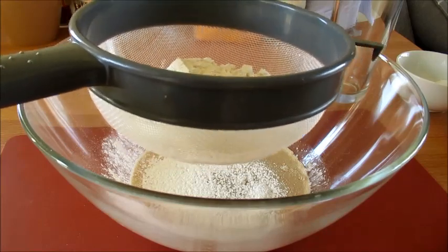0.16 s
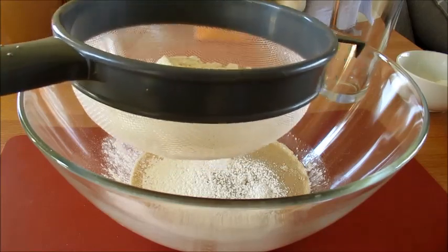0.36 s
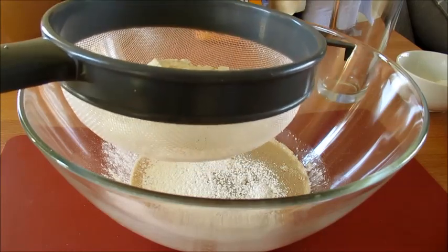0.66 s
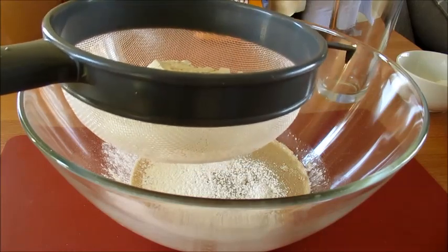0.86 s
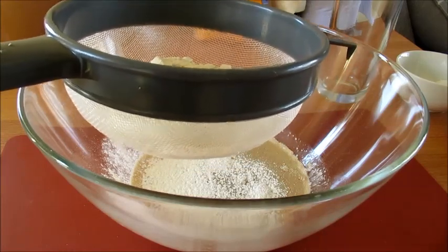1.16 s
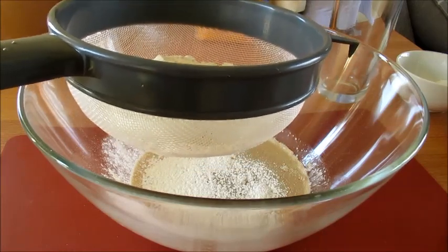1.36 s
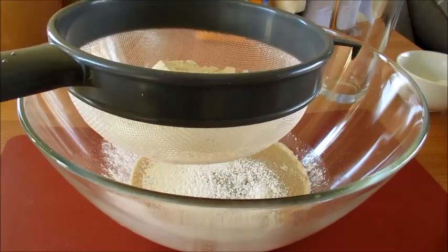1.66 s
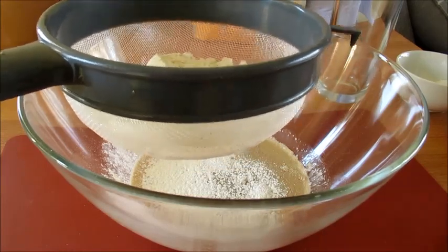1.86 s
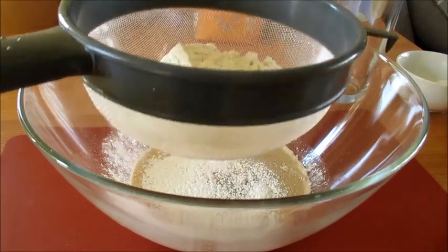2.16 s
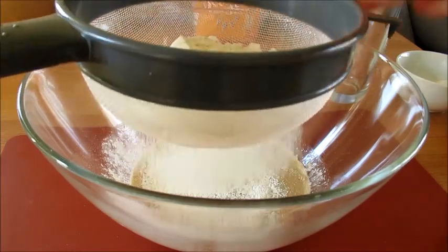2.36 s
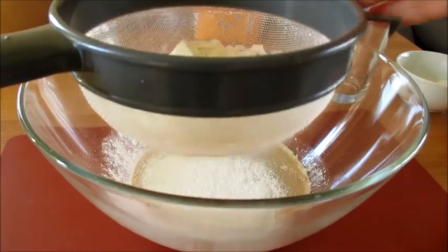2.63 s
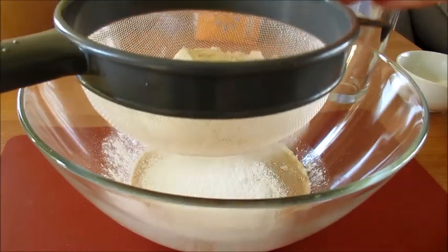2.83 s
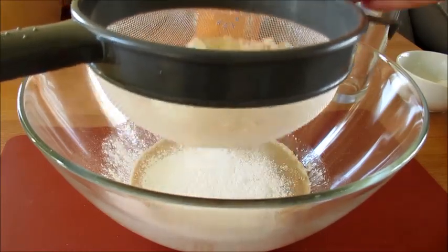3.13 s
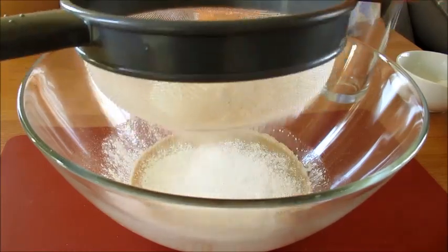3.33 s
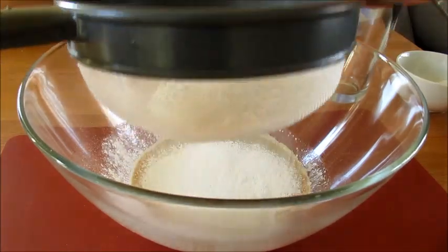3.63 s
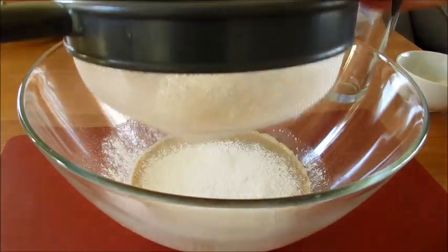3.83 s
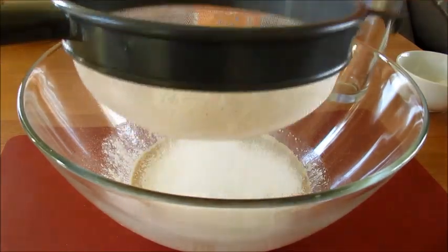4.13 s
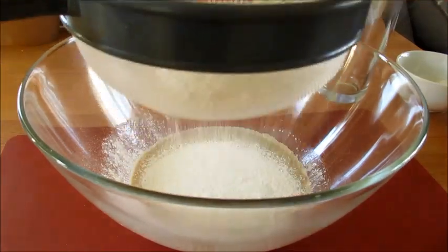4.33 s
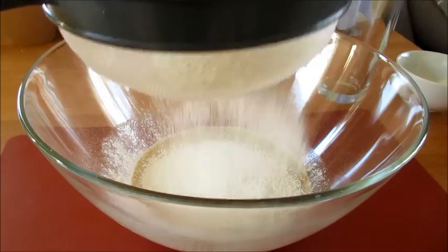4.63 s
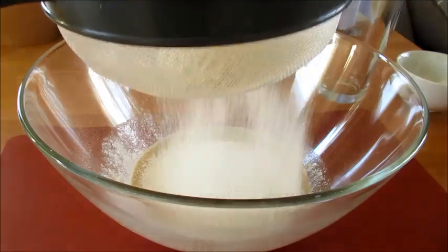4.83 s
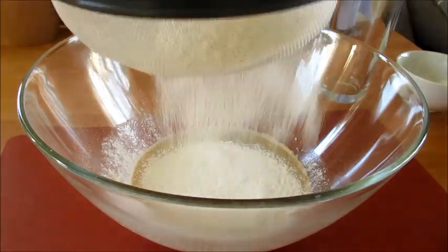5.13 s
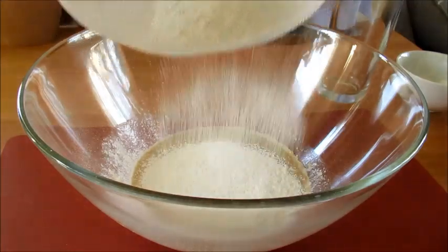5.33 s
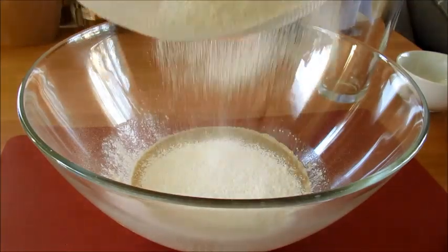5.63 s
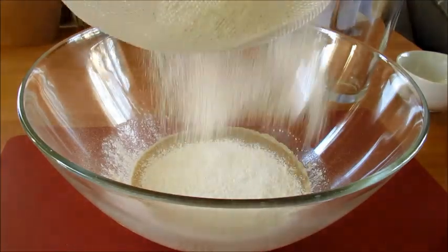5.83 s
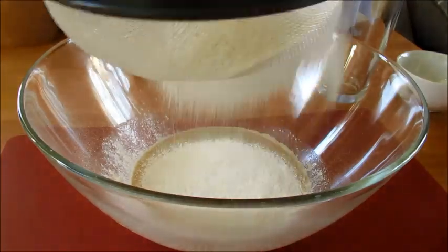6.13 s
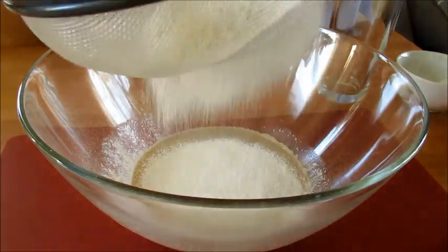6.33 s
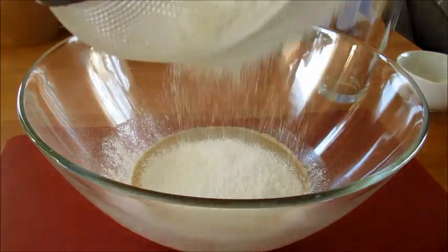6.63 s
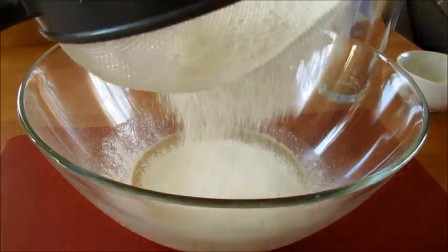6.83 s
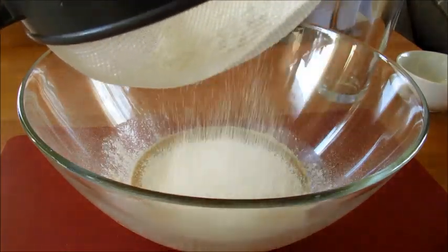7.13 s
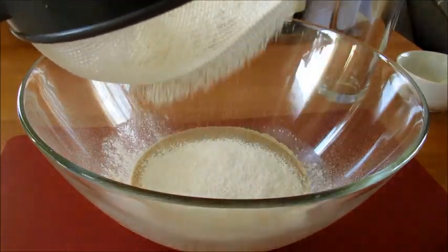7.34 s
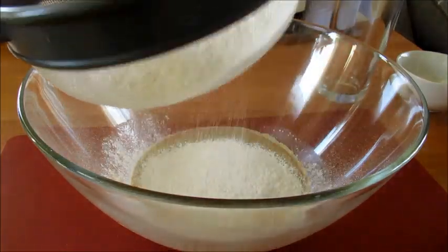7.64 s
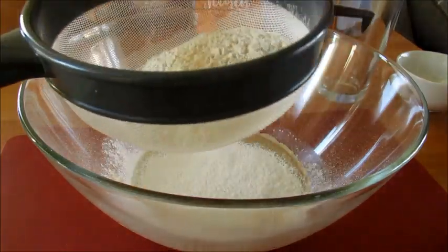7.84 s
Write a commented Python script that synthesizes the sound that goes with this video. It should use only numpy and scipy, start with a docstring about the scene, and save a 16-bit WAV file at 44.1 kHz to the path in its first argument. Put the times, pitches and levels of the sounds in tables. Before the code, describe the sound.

A small, quiet kitchen heard close up in mono, with soft, mostly low room noise. In the first 0.6 seconds a very faint low growl sits in a soft swelling rush, then a plain sinking hum fades out by about 1.3. At 1.2 a hard double clack sounds, and at 1.4 the loudest, heaviest knock, woody and ringing, with a thin high glass ping. A short low rubbing slide follows, groaning slightly at 1.6, and ends in a duller bump at 1.7. Near quiet until 2.4, when a hand begins patting the sieve about six times a second: soft low thumps, crisp gritty mesh hiss and a softer patter of falling flour. Small low plops join, clearest around 2.7 to 5.5. The rasps grow brighter and stronger at 6.5 to 7.0, with a tiny snap at 6.7, then weaken towards 7.9.

```python
"""In a small kitchen, flour is sifted into a glass bowl. A faint growl in a soft rush opens, then a plain hum.
A clack, a heavy knock, a short slide and a second knock set the table and the bowl ringing: filtered clicks
and rubbing noise drive a set of decaying or resonant notes. Then a hand pats the sieve about six times a second:
each pat is a low thump and a burst of gritty hiss from the mesh, and the tossed flour drops back a moment later
as softer hiss, at times with a small, low plop."""
import sys
import numpy as np
from scipy import signal
from scipy.fft import rfft, irfft
from scipy.io import wavfile

SR = 44100
rng = np.random.default_rng(int(sys.argv[2]) if len(sys.argv) > 2 else 0)


def persist_wave(psi):
    """Save psi, clipped to +-1, as 16-bit WAV."""
    counts = np.round(np.clip(psi, -1, 1) * 32767).astype(np.int16)
    wavfile.write(sys.argv[1], SR, np.atleast_2d(counts).T)


N = 352359
TIME = np.arange(N) / SR
ONE_SECOND = TIME[:SR]
SHORT = TIME[:8192]


def from_db(db):
    """Turn decibels into a gain."""
    return 10 ** (np.asarray(db) / 20)


def rms_one(x):
    """Scale a sound to an rms (average strength) of 1."""
    return x / np.sqrt(np.mean(x ** 2) + 1e-20)


def at_hz(points, hz):
    """Read a table between its rows, with frequency on a log axis."""
    f, value = np.transpose(points)
    return np.interp(np.log(hz + 1e-9), np.log(f), value)


def noise(spectrum, size=N):
    """Random noise whose frequencies are weighted by a spectrum, rms 1."""
    hz = np.fft.rfftfreq(size, 1 / SR)
    white = rfft(rng.standard_normal(size))
    return rms_one(irfft(white * from_db(at_hz(spectrum, hz)), size))


def cut(x, hz, kind, order=2):
    """Butterworth filter: keep only the low, high or middle frequencies."""
    return signal.sosfilt(signal.butter(order, hz, kind, fs=SR, output="sos"), x)


def resonate(x, hz, width_hz):
    """A resonance that favours one frequency, with gain 1 at its top."""
    return signal.lfilter(*signal.iirpeak(hz, hz / width_hz, fs=SR), x)


def ring(hz, t60):
    """A struck note that starts at height 1 and falls by 60 dB in t60 seconds."""
    return np.sin(2 * np.pi * hz * ONE_SECOND) * from_db(-60 * ONE_SECOND / t60)


def swell(rise_s):
    """An envelope that reaches 1 after rise_s and then dies away."""
    return SHORT / rise_s * np.exp(1 - SHORT / rise_s)


def envelope(start_s, attack_s, hold_s, release_s):
    """Rise, hold and fall in straight lines, between 0 and 1."""
    corners = start_s + np.cumsum([0, attack_s, hold_s, release_s])
    return np.interp(TIME, corners, [0, 1, 1, 0])


def tone(shape, hz, glide_hz_per_s, waver, partials=((1, 0),)):
    """Soft partials on a gliding pitch that wavers at random, under an envelope."""
    pitch = hz + glide_hz_per_s * (TIME - shape[0])
    unsteady = rms_one(cut(rng.standard_normal(N), 21, "low"))
    # a changing pitch must be summed up over time to give the phase
    phase = 2 * np.pi * np.cumsum(pitch * (1 + waver * unsteady)) / SR
    mix = np.zeros(N)
    for multiple, db in partials:
        mix += from_db(db) * np.sqrt(2) * np.sin(multiple * phase)
    return envelope(*shape) * mix


def add(out, s, sound):
    """Mix a sound in at time s, cutting what runs past the end."""
    i = round(s * SR)
    out[i:i + len(sound)] += sound[:N - i]


# how long the kitchen echoes at each pitch: (frequency [Hz], time to fall by 60 dB [s])
KITCHEN_DECAY = [(125, 0.35), (2000, 0.41), (14000, 0.18)]


def kitchen(x, build_s=0.002):
    """Diffuse reflections build up quickly and die at each octave's own speed; the response has unit energy."""
    response = np.zeros(SR)
    edges = 2. ** np.arange(6, 15)
    for low, high in zip(edges, edges[1:]):
        band = cut(rng.standard_normal(SR), [low, high], "band", order=4)
        t60 = at_hz(KITCHEN_DECAY, np.sqrt(low * high))
        response += band * from_db(-60 * ONE_SECOND / t60)
    response *= 1 - np.exp(-(ONE_SECOND / build_s) ** 2)
    return signal.fftconvolve(x, response / np.linalg.norm(response))[:N]


# spectrum of the quiet room: (frequency [Hz], relative level [dB per Hz])
ROOM_COLOUR = [(15, -27), (25, -3.5), (69, -3), (128, -7), (264, -3), (326, -6), (529, -8), (856, -10),
               (978, -7.5), (1540, -12), (3930, -18), (6370, -18.5), (10900, -21), (13800, -26),
               (15000, -30.5)]


def room_floor(level_db=-54.5):
    """The quiet of the kitchen is a steady, mostly low noise."""
    return from_db(level_db) * noise(ROOM_COLOUR)


# shapes are (start [s], attack [s], hold [s], release [s])
GROWL_SHAPE, GROWL_HZ, GROWL_SAG_HZ_PER_S = (0.015, .005, 0.43, 0.19), 66.7, 9.25
HUM_SHAPE, HUM_HZ, HUM_SAG_HZ_PER_S = (.52, 0.25, .08, 0.45), 181, 22
# the rush has already begun to swell before the sound starts
RUSH_SHAPE = (-0.245, 0.77, 0.026, 0.049)
# partials of the growl: (multiple of its pitch, relative level [dB])
GROWL_PARTIALS = [(2, -12), (3, -6), (4, -1.5), (6, -5.5)]
# spectrum of the rush: (frequency [Hz], relative level [dB per Hz])
RUSH_COLOUR = [(80, -10), (230, 1), (700, -8), (2400, -13), (5000, -39)]


def drone():
    """A faint growl in a soft rush gives way to a plain hum; both pitches sink."""
    growl = tone(GROWL_SHAPE, GROWL_HZ, -GROWL_SAG_HZ_PER_S, waver=.02, partials=GROWL_PARTIALS)
    hum = tone(HUM_SHAPE, HUM_HZ, -HUM_SAG_HZ_PER_S, waver=0.0063)
    rush = envelope(*RUSH_SHAPE) * noise(RUSH_COLOUR)
    return from_db(-58.5) * growl + from_db(-52.5) * hum + from_db(-55) * rush


# the slide between the knocks: (start [s], attack [s], hold [s], release [s])
SLIDE_SHAPE = (1.387, 0.15, 0.157, 0.033)
GROAN_FADE_S = 0.016  # fade-in and fade-out alike
# spectrum of the rubbing: (frequency [Hz], relative level [dB per Hz])
SLIDE_COLOUR = [(50, -73), (140, -1.5), (190, -9), (380, -3), (660, -7.5), (1000, -17), (1800, -20),
                (4000, -34), (10000, -43), (15000, -44)]
# stick-slip groans late in the slide: (start [s], hold [s], pitch [Hz], glide [Hz per s], level [dB])
GROANS = [(1.603, .064, 323, 751.5, -33.5), (1.622, 0.0051, 640, 2, -25.5)]


def slide(level_db=-32, ring_db=6, width_hz=22):
    """Friction rumbles through the same modes that the knocks strike, and groans as it sticks."""
    rub = noise(SLIDE_COLOUR)
    sung = np.zeros(N)
    for hz, _, _ in MODES:
        sung += resonate(rub, hz, width_hz)
    out = from_db(level_db) * envelope(*SLIDE_SHAPE) * rms_one(rub + from_db(ring_db) * sung)
    for s, hold_s, hz, glide, db in GROANS:
        shape = (s, GROAN_FADE_S, hold_s, GROAN_FADE_S)
        out += from_db(db) * tone(shape, hz, glide, waver=0.0288)
    return out


PING_S = 1.425  # just after the heavy knock
# thin glass notes: (frequency [Hz], level before the beating [dB], time to fall by 60 dB [s])
PING_NOTES = [(3890, -37, 0.096), (5510, -47, .07), (6530, -38.5, 0.1), (8710, -42.5, 0.088),
              (10100, -72, .6)]


def ping(room_db=-8, beat_hz=24, beat_depth=.6):
    """The jolted glass rings high and thin with a beating level, blurred by the room."""
    notes = np.zeros(SR)
    for hz, db, t60 in PING_NOTES:
        notes += from_db(db) * ring(hz, t60)
    beating = 1 + beat_depth * np.sin(2 * np.pi * beat_hz * ONE_SECOND)
    out = np.zeros(N)
    add(out, PING_S, beating * notes)
    return out + from_db(room_db) * kitchen(out)


def click(spectrum):
    """The sharpest click with this spectrum that starts at once (minimum phase), as a frequency response."""
    log_gain = np.log(from_db(at_hz(spectrum, np.fft.rfftfreq(SR, 1 / SR))))
    # folding the cepstrum's second half onto its first gathers the energy at the start
    cepstrum = irfft(log_gain, SR)
    cepstrum[1:SR // 2] *= 2
    cepstrum[SR // 2 + 1:] = 0
    return np.exp(rfft(cepstrum))


def chatter(length_s, bounce=0.66, count=3):
    """Quick repeated contacts smear a blow in time and keep its colour: a chain of all-passes."""
    hz = np.fft.rfftfreq(SR, 1 / SR)
    uneven = rng.uniform(.85, 1.15, count)
    lags = np.round(length_s * SR * uneven / np.arange(1, count + 1))
    delay = np.exp(-2j * np.pi * hz * lags[:, None] / SR)
    return np.prod((delay - bounce) / (1 - bounce * delay), axis=0)


BOWL_HZ = 1714  # the clear note of the glass bowl, one of the modes
# what table and bowl ring with: (frequency [Hz], relative level [dB], time to fall by 60 dB [s])
MODES = [(145, 8.8, 0.4), (283, 5, 0.32), (320, 0, 0.21), (441, 5.2, 0.34), (670, 8.2, 0.054),
         (645, 0, 0.41), (800, -1.7, 0.35), (762, -5, 0.38), (820, 14.5, 0.12), (940, 5.5, 0.18),
         (1265, 2.3, 0.42), (1200, 4, 0.28), (BOWL_HZ, 6.8, 0.52), (4100, 3, 0.47)]


def table_and_bowl(colour):
    """Table and bowl ring on, each mode as strongly as the blow's colour excites it."""
    modes = np.zeros(SR)
    for k, (hz, db, t60) in enumerate(MODES):
        sign = (-1) ** k  # neighbours start in opposite directions
        modes += sign * from_db(db + at_hz(colour, hz)) * ring(hz, t60)
    return modes


# brief, bright modes that only a clack excites: (frequency [Hz], relative level [dB], time to fall by 60 dB [s])
CLACK_MODES = [(1876, -9, .045), (2940, -14, .06), (3290, -10, 0.036), (4940, -22, 0.061),
               (6020, -31, 0.077), (7800, -23, 0.049)]
# colours of the hard contacts, for each kind: (frequency [Hz], relative level [dB per Hz])
COLOURS = { "clack": [(250, -24), (580, -14), (800, 4), (1040, -18), (1200, -6.5), (1470, -13),
           (1870, -6.5), (2450, -14), (2880, -13), (3330, -15.5), (4500, -26.5), (5300, -25), (8200, -29),
           (15000, -45)], "knock": [(50, -37), (110, -18), (380, -7.5), (620, 1), (780, -8.5), (900, -4),
           (1250, -18.5), (1700, -19.5), (3000, -31.5), (4700, -45), (8700, -55), (15000, -72)],
           "bump": [(50, -26), (110, -13), (500, -7.5), (800, -4.5), (1750, -11), (2500, -22),
           (3500, -34.5), (12000, -59)], "snap": [(200, -4), (1900, 0.5), (2600, -2), (5000, 1),
           (15000, -27)]}
# how each kind behaves: (nominal chatter length [s], relative ring level [dB], room level against the blow [dB])
CONTACTS = {"clack": (.0009, -30, -6.5), "knock": (.003, -8, -9), "bump": (.0022, -4, -1.2),
            "snap": (0.00046, -48, -14)}
# hard contacts: (time [s], kind, relative level [dB])
KNOCKS = [(1.1708, "clack", -19), (1.196, "clack", -28), (1.4171, "knock", -6.5), (1.516, "clack", -36.5),
          (1.602, "clack", -32), (1.712, "bump", -15.5), (1.94, "bump", -46), (6.6678, "snap", -33.5)]


def knocks(blow_db=23, modes_db=-6):
    """Each knock is a hard contact with a brief chatter; modes ring on by its colour, and the room answers."""
    out = np.zeros(N)
    for s, kind, db in KNOCKS:
        length_s, ring_db, room_db = CONTACTS[kind]
        blow = irfft(click(COLOURS[kind]) * chatter(length_s), SR)
        blow = from_db(db + blow_db) * blow / np.linalg.norm(blow)
        if kind == "clack":
            for hz, mode_db, t60 in CLACK_MODES:
                blow += from_db(db + mode_db) * ring(hz, t60)
        ringing = from_db(db + ring_db + modes_db) * table_and_bowl(COLOURS[kind])
        add(out, s, blow + ringing)
        add(out, s, from_db(room_db) * kitchen(blow))
    return out


# each pat tosses the flour, which is back on the mesh after FALL_S
FALL_S = 0.034
# while the sieve is held level, a pat firm enough to toss the whole heap ends in a small plop
LEVEL_FROM_S, LEVEL_UNTIL_S, TOSSING_THUMP_DB = 2.8, 6.4, -50.7
# the heaviest landings: (time [s], relative level [dB])
LANDINGS = [(2.709, -37.5), (3.2352, -32.5), (3.917, -39), (4.088, -41), (4.433, -39.5), (4.788, -37),
            (5.48, -41)]


def light_landings(level_db=-45, scatter_db=1.5):
    """The remaining firm pats on the level sieve are each followed by a small landing: (time [s], level [dB])."""
    landings = []
    for s, _, thump_db in PATS:
        is_level = LEVEL_FROM_S < s < LEVEL_UNTIL_S
        lands_heavily = any(0 < heavy_s - s < 2 * FALL_S for heavy_s, _ in LANDINGS)
        if is_level and thump_db > TOSSING_THUMP_DB and not lands_heavily:
            landings.append((s + FALL_S, level_db + scatter_db * rng.standard_normal()))
    return landings


# the loaded mesh: (frequency before detuning [Hz], relative level [dB], rise time [s])
PLOP = [(308, -1.5, 0.0018), (547, 1, .0018)]


def drops(plop_db=1, detune=0.078):
    """The heap lands softly and the loaded mesh answers with a few low cycles."""
    out = np.zeros(N)
    for s, db in list(LANDINGS) + light_landings():
        load = np.exp(detune * rng.standard_normal())  # each landing has a slightly different pitch
        plop = np.zeros(len(SHORT))
        for hz, mode_db, rise_s in PLOP:
            plop += from_db(mode_db) * swell(rise_s) * np.sin(2 * np.pi * hz * load * SHORT)
        add(out, s, from_db(db + plop_db) * cut(plop, 1700, "low"))
    return out


def grains(spectrum, grain_db=0.5):
    """A short stretch of gritty hiss: many tiny contacts of uneven size."""
    sizes = np.repeat(rng.standard_normal(len(SHORT) // 16), 16)
    return rms_one(noise(spectrum, size=len(SHORT)) * from_db(grain_db * sizes))


def rustle(spectrum, shape):
    """A burst of grains whose energy is that of its envelope."""
    burst = grains(spectrum) * shape
    return burst * np.linalg.norm(shape) / np.linalg.norm(burst)


def push(db, low_hz=54, high_hz=125, firm_db=-34, octave_db=15):
    """The soft thump of the palm; a lighter pat sounds lower and longer."""
    pitch = 2 ** ((db - firm_db) / octave_db)
    thump = cut(-swell(0.00043), low_hz * pitch, "high")
    thump = cut(thump, high_hz * pitch, "low")
    return from_db(db) * thump / np.abs(thump).max()


# a firm pat shakes the mesh briefly; the rise time doubles as the thump gets softer by SOFTER_DB
FIRM_THUMP_DB, FIRM_RISE_S, SOFTER_DB = -43, 0.0016, 8
# the fine sizzle at an ordinary pat, and the share of the mesh's swing in dB that it follows
USUAL_MESH_DB, SIZZLE_DB, SIZZLE_FOLLOWS = -36.5, -48.5, 0.61
# spectra of the shaken mesh and of the fine grains: (frequency [Hz], relative level [dB per Hz])
MESH_COLOUR = [(400, -23), (1900, -3), (2700, -6.5), (3600, 0.5), (4300, 0), (5900, -0.5), (7300, -4),
               (10000, -10), (15000, -25)]
SIZZLE_COLOUR = [(3000, -8.5), (9500, -1.5), (16000, -3)]
# small ticks of the sieve frame: (time [s], frequency [Hz], level [dB])
TICKS = [(2.398, 6500, -46), (6.852, 2000, -41)]
# pats on the sieve: (time [s], relative mesh level [dB], relative thump level [dB])
PATS = [(2.3796, -39.5, -48), (2.5292, -37.5, -45), (2.7022, -28.5, -45), (2.8694, -28, -41.5),
        (3.034, -37.5, -43), (3.1897, -31.5, -43), (3.375, -35.5, -46), (3.5389, -37.5, -44.5),
        (3.7029, -34.5, -50), (3.8757, -37, -46), (4.0448, -35, -45), (4.2277, -37.5, -58),
        (4.3876, -40.5, -49.5), (4.568, -39, -48.5), (4.7458, -33, -48), (4.9246, -37.5, -49.5),
        (5.0928, -37.5, -48), (5.2729, -39.5, -54), (5.4422, -32.5, -50.5), (5.6295, -37.5, -52),
        (5.7847, -36, -47), (5.9698, -37.5, -49.5), (6.134, -31, -42), (6.3119, -33.5, -49.5),
        (6.5007, -23.5, -54.5), (6.6678, -26.5, -42.5), (6.8349, -31.5, -48), (7.0049, -21, -55),
        (7.1809, -35.5, -61), (7.3645, -36.5, -55), (7.5325, -34, -52), (7.5464, -34, -56),
        (7.719, -42, -56), (7.903, -48, -60)]


def pats(mesh_db=-11.0, push_db=11, zing_db=18, zing_hz=5900, zing_width_hz=1300, fall_db=-56, crispness=2.66):
    """The palm pushes the frame, the mesh rasps, and the tossed powder patters back."""
    out = np.zeros(N)
    for s, db, thump_db in PATS:
        rise_s = FIRM_RISE_S * 2 ** ((FIRM_THUMP_DB - thump_db) / SOFTER_DB)
        shake = swell(rise_s) ** (crispness / 2)
        rasp = from_db(db + mesh_db) * rustle(MESH_COLOUR, shake)
        # the harder the shake, the more the wires zing
        rasp = rasp + from_db(db + zing_db) * resonate(rasp, zing_hz, zing_width_hz)
        sizzle_db = SIZZLE_DB + SIZZLE_FOLLOWS * (db - USUAL_MESH_DB)
        sizzle = from_db(sizzle_db) * rustle(SIZZLE_COLOUR, shake)
        patter = (grains(MESH_COLOUR) + grains(SIZZLE_COLOUR)) * swell(0.0053)
        add(out, s, rasp + sizzle)
        add(out, s + rise_s * 0.88, push(thump_db + push_db))
        add(out, s + FALL_S, from_db(fall_db) * patter)
    for s, hz, db in TICKS:
        add(out, s, from_db(db) * swell(0.0014) * np.sin(2 * np.pi * hz * SHORT))
    return out


def scene():
    """Knocks and sifting over the quiet of the kitchen, as one channel."""
    background = room_floor() + drone()
    setting_down = slide() + ping() + knocks()
    sifting = drops() + pats()
    echo = from_db(-14.0) * kitchen(sifting)
    return (background + setting_down + sifting + echo)[None]


def record(dry):
    """Peaks are rounded, and a steep filter removes what lies above 15.2 kHz."""
    rounded = np.tanh(dry)
    return signal.sosfilt(signal.ellip(12, .1, 80, 15200, fs=SR, output="sos"), rounded)


dry = scene()
out = record(dry)
persist_wave(out)
```